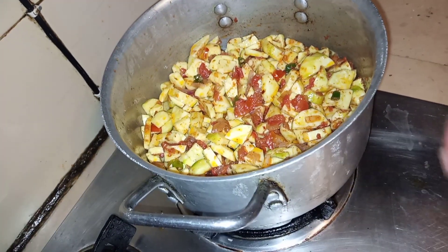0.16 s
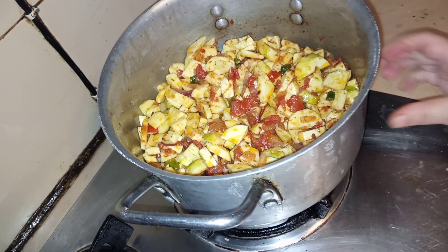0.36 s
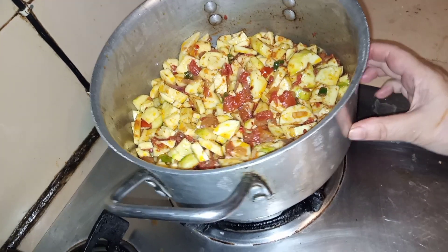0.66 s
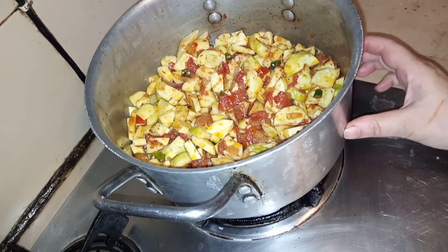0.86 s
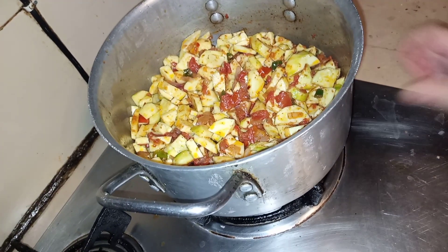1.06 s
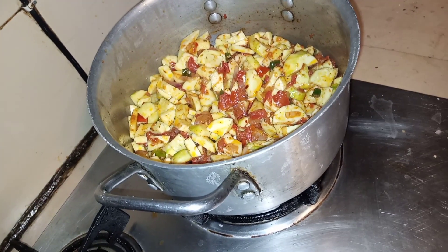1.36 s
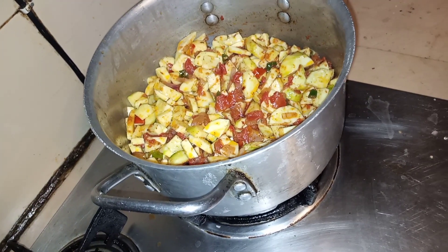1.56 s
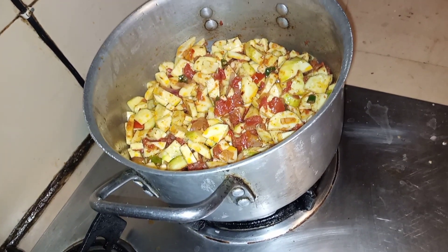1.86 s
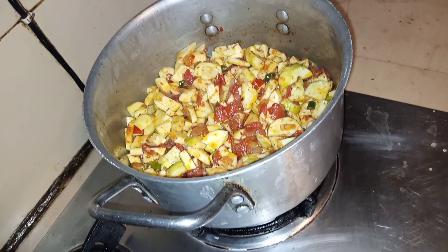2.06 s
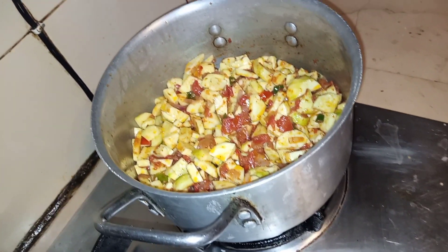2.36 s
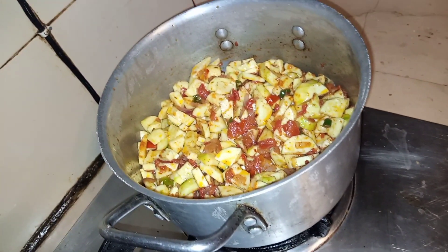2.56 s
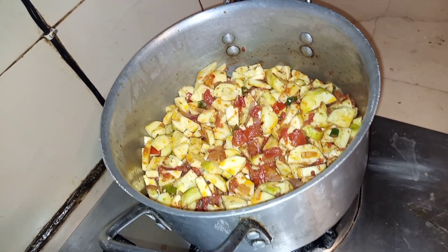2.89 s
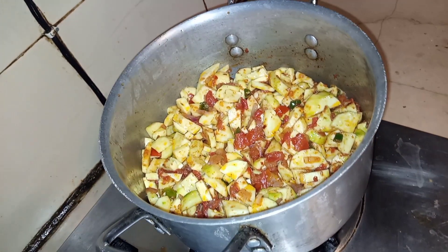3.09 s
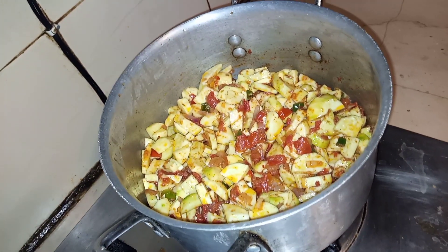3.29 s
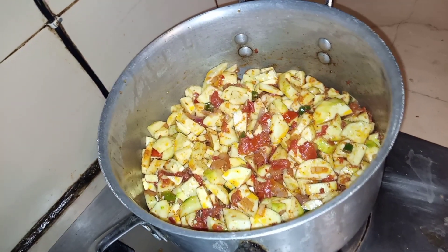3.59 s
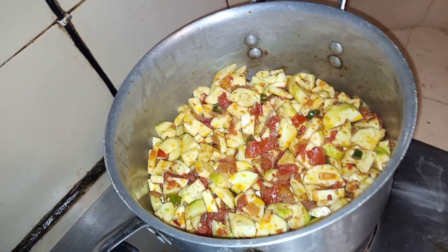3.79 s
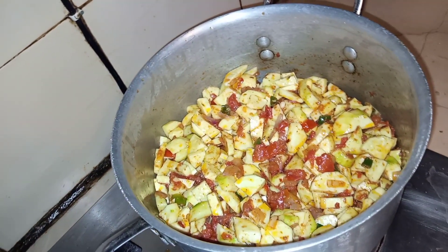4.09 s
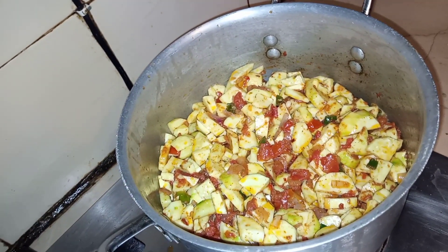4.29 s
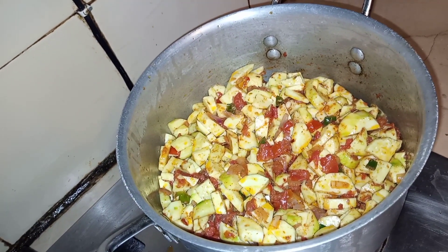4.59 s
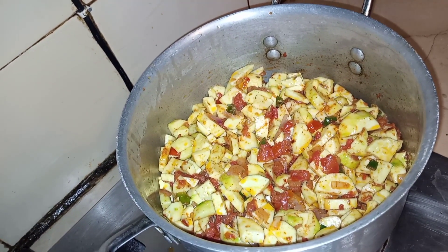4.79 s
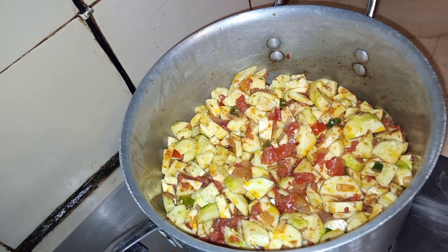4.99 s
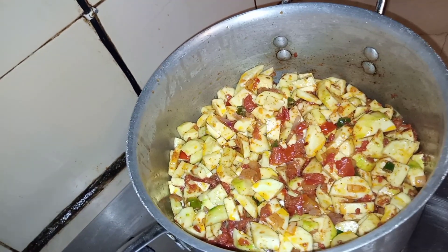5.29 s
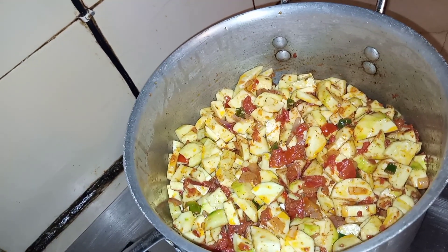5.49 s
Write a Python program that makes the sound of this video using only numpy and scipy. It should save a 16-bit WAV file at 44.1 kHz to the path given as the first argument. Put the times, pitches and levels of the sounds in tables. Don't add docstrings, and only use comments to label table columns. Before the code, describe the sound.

Quiet, steady fine sizzle of vegetables frying in a metal pot, with sparse snaps, faint distant thumps and a brief metallic scrape near the end.

```python
import sys
import numpy as np
from scipy import signal
from scipy.fft import rfft, irfft
from scipy.io import wavfile
from scipy.ndimage import uniform_filter1d

SR = 44100
rng = np.random.default_rng(int(sys.argv[2]) if len(sys.argv) > 2 else 0)


def log_audio(samples):
    frames = np.atleast_2d(samples).T
    limited = np.clip(frames, -1, 1)
    pcm = np.round(limited * 32767).astype(np.int16)
    wavfile.write(sys.argv[1], SR, pcm)


def gain_from_db(level_db):
    decades = np.asarray(level_db, float) / 20
    return 10 ** decades


N = 249144
CUTOFF_HZ = 15750


def rms_one(x):
    return x / np.sqrt(np.mean(x ** 2) + 1e-20)


def evened(x, window_s):
    return x / np.sqrt(uniform_filter1d(x ** 2, max(int(window_s * SR), 1)) + 1e-20)


def drift(rate):
    r = np.exp(-80 * np.pi * rate / SR)
    slow = signal.lfilter([1], [1, -2 * r, r * r], rng.standard_normal(N // 40 + 2002))
    slow = slow[2000:]
    return np.interp(np.arange(N) / 40, np.arange(len(slow)), rms_one(slow))


def ramp_db(s, hold, rise_db_s, fall_db_s):
    t = np.arange(N) / SR - s
    return np.minimum(rise_db_s * t, 0) - fall_db_s * np.maximum(t - hold, 0)


def resonate(x, hz, width_hz):
    r = np.exp(-np.pi * min(width_hz, SR / 3) / SR)
    return signal.lfilter([(1 - r * r) / 2, 0, (r * r - 1) / 2], [1, -2 * r * np.cos(2 * np.pi * hz / SR), r * r], x)


def body(x, modes):
    out = 0
    for k, (hz, width, db) in enumerate(modes):
        out = out + (-1) ** k * gain_from_db(db) / np.sqrt(width) * resonate(x, hz, width)
    return out


def bursts(per_s, spread_db):
    sizes = gain_from_db(spread_db * np.minimum(rng.exponential(1, N), 5)) * rng.choice([-1, 1], N)
    return rms_one(sizes * (rng.random(N) < per_s / SR) + 1e-18)


def tone_bursts(rows):
    out = np.zeros(N + SR)
    for s, db, hz, length in rows:
        t = np.arange(max(int(length * SR), 8)) / SR
        at = max(round((s - length / 2) * SR), 0)
        envelope = np.sin(np.pi * t / length) ** 2
        out[at:at + len(t)] += gain_from_db(db + 3) * envelope * np.sin(2 * np.pi * hz * t)
    return out[:N]


def spurt_db():
    # start_s, hold_s, lift_db (below 0: a dip)
    spurts = [(0.653, 0.0097, 0.5), (0.803, 0.0113, 1), (1.024, 0.035, -0.34), (1.518, 0.0304, 0.9),
              (2.042, 0.041, 0.5), (2.447, 0.033, 0.7), (2.855, 0.0125, 0.8), (3.142, 0.054, 1),
              (4.492, 0.0404, 1.5), (4.694, 0.055, 2), (5.379, .08, 1), (5.493, 0.075, 1.18)]
    rise_s, fall_s = 0.0117, 0.029
    return sum(db * gain_from_db(ramp_db(s, hold, 20 / rise_s, 20 / fall_s)) for s, hold, db in spurts)


def frying(per_s=14000, spread_db=3.0, blur=0.72, patchy_db=0.43, shared_db=.5):
    # frequency_hz, density_db (per Hz)
    oil_colour = [(500, -23), (850, -11.5), (1005, -9), (1035, -3.5), (1085, -2.5), (1160, -7), (1310, -11),
                  (1470, -8.5), (1740, -8.5), (2030, -4.5), (4470, -1.5), (5900, -3), (7980, -12),
                  (9600, -10), (13600, -17)]
    # frequency_hz, density_db (per Hz)
    port_colour = [(13870, -17), (14260, -15.5), (14620, -15), (15710, -10.5)]
    # frequency_hz, width_hz, boost_db
    pot_modes = [(1065, 70, 1), (1500, 38, 4), (2010, 78, 2.5), (2448, 110, 2), (2643, 279, 2.5),
                 (2884, 120, 2), (3169, 300, 2), (3330, 55, -2), (3615, 710, 3.5), (4177, 170, 2.03),
                 (5130, 110, -0.38), (5050, 71, -3), (5680, 620, 0.4), (6256, 110, 1.53), (6713, 74, 3),
                 (6800, 160, -0.5), (9100, 550, 1.66)]
    # start_s, sizzle_db
    vigour = [(0, -47), (.55, -48), (.87, -48), (1.13, -48.5), (1.4, -49.5), (1.8, -48.5), (2.1, -50.5),
              (2.5, -49.5), (2.9, -49.5), (3.6, -49.5), (4.4, -50), (4.64, -51), (4.85, -49.5), (5.05, -51),
              (5.35, -49), (5.5, -49), (5.65, -49)]
    # level_db (at usual vigour), vigour_share, spurt_share
    layers = [(-58.5, 0.39, 1.3), (-61, 0.47, 2.52), (-64.5, 0.49, 1.9)]

    start_s, vigour_db = np.transpose(vigour)
    sizzle_db = np.interp(np.arange(N) / SR, start_s, vigour_db)
    lift_db = spurt_db()
    usual_db = -50
    hum_db, fine_db, finest_db = (db + follows * (sizzle_db - usual_db) + lifted * lift_db
                                  for db, follows, lifted in layers)

    source = np.sqrt(1 - blur) * bursts(per_s, spread_db) + np.sqrt(blur) * rng.standard_normal(N)
    hz = np.maximum(np.fft.rfftfreq(N, 1 / SR), 1)
    points_hz, points_db = np.transpose(list(oil_colour) + list(port_colour))
    colour = gain_from_db(np.interp(np.log(hz), np.log(points_hz), points_db))
    for centre, width, db in pot_modes:
        colour = colour * gain_from_db(db / (1 + (2 * (hz - centre) / width) ** 2))
    top_db = np.interp(hz, CUTOFF_HZ + np.array([0, 20, 120, 140]), [0, -8, -8, -90])
    spectrum = rfft(source) * colour * gain_from_db(top_db)

    centres = np.array([850, 1050, 1300, 1600, 2000, 2500, 3100, 3900, 4900, 6000, 7200, 8500,
                        10000, 12000, 13500, 13900, 14300, 15600])
    groups, together = np.zeros((4, N)), drift(6.3)
    for k, centre in enumerate(centres):
        mask = np.interp(np.log(hz), np.log(centres), np.arange(len(centres)) == k)
        flicker = gain_from_db(patchy_db * drift(10) + shared_db * together)
        groups[np.searchsorted([1700, 7300, 14000], centre)] += flicker * irfft(spectrum * mask, N)
    hum, sizzle, fine, finest = (evened(g, 0.19) for g in groups)
    return gain_from_db(hum_db) * hum + gain_from_db(sizzle_db + lift_db) * sizzle + gain_from_db(fine_db) * fine + gain_from_db(finest_db) * finest


def house():
    # frequency_hz, width_hz, level_db
    floor_modes = [(54.7, 11, -9), (90.4, 32, 4)]
    wall_modes = [(138.8, 35.2, 0.15), (230, 144, -0.67)]
    cupboard_modes = [(285, 49, -10), (330, 35, 2.5), (388, 39.6, 1.5), (461.5, 58, -3)]
    worktop_modes = [(534, 49, -1.8), (643, 40, -0.45), (706, 63, -1.6), (867, 92, -0.81)]
    # start_s, hold_s, level_db
    on_floor = [(0.56, 0.22, -70.5), (0.765, 0.095, -64.5), (0.914, 0.073, -68), (1.116, 0.045, -68.5),
                (1.246, .14, -74.5), (1.467, 0.11, -71), (1.763, 0.11, -73), (2.004, .02, -71),
                (2.19, 0.048, -75), (2.556, .07, -71), (2.676, 0.116, -63.5), (2.973, 0.064, -66),
                (3.14, 0.069, -66), (3.233, 0.039, -64), (3.402, 0.031, -73), (3.56, 0.0204, -69.5),
                (3.79, 0.038, -69), (3.893, 0.1, -70.5), (4.06, 0.039, -73), (4.238, 0.034, -64),
                (4.377, .02, -71), (4.506, 0.038, -70), (4.671, .02, -69), (4.749, 0.0195, -64),
                (4.88, .02, -70), (5.205, 0.0214, -73), (5.327, 0.032, -72), (5.431, 0.083, -65),
                (5.595, .02, -75.5)]
    on_wall = [(0, 0.027, -71.5), (.33, .02, -69), (.75, 0.06, -61), (.82, 0.11, -66), (.94, 0.091, -64.5),
               (1.12, 0.033, -70), (1.47, 0.081, -70.5), (1.71, 0.018, -78.5), (2.19, .05, -75),
               (2.55, 0.137, -71.5), (2.75, 0.11, -64.5), (3.03, 0.013, -67), (3.15, 0.067, -66),
               (3.22, 0.037, -66), (3.85, 0.0185, -71), (4.22, 0.0325, -61), (4.36, 0.0186, -70),
               (4.51, 0.041, -74), (4.68, 0.15, -74), (5.4, 0.195, -63.5), (5.56, 0.052, -71.5)]
    on_cupboard = [(.2, 0.122, -72), (.44, 0.32, -71.5), (0.745, 0.14, -60), (.87, 0.14, -64),
                   (1.17, 0.16, -71.5), (1.96, 0.024, -66.5), (2.43, 0.039, -75.5), (2.735, 0.019, -62),
                   (2.77, 0.068, -67), (3.15, 0.114, -67), (3.41, 0.091, -68.5), (3.5, 0.177, -64),
                   (3.68, 0.12, -62.5), (3.88, 0.18, -64.5), (4.18, 0.16, -65.5), (4.5, 0.039, -65.5),
                   (4.7, 0.095, -71.5), (5.22, 0.028, -69), (5.33, 0.038, -61.5), (5.43, 0.088, -59),
                   (5.51, 0.1, -58.5)]
    on_worktop = [(0, 0.45, -66), (.4, 0.091, -64), (.75, 0.094, -62), (.99, 0.029, -63),
                  (1.11, 0.047, -65), (1.21, 0.3, -63.5), (1.7, 0.37, -68.5), (2.5, 0.071, -64.5),
                  (2.73, 0.053, -61), (2.88, 0.47, -66.5), (3.4, 0.092, -67.5), (3.52, 0.164, -60.5),
                  (3.68, 0.24, -61), (4, 0.166, -63), (4.18, 0.25, -64), (4.5, 0.06, -65),
                  (4.75, 0.125, -66.5), (5.32, 0.2, -63), (5.49, 0.14, -58.5)]
    stirrings = [-80, -77, -78.5, -72]

    rise_db_s, fall_db_s = 897.5, 260.5
    out = 0
    struck = zip((on_floor, on_wall, on_cupboard, on_worktop),
                 (floor_modes, wall_modes, cupboard_modes, worktop_modes), stirrings)
    for bumps, modes, stir_db in struck:
        wider = [(hz, 1.54 * width, 0) for hz, width, _ in modes]
        shaken = body(body(bursts(1800, 0.97), modes), wider)
        level_db = stir_db + 1.0 * drift(6)
        for s, hold, db in bumps:
            level_db = np.maximum(level_db, db + ramp_db(s, hold, rise_db_s, fall_db_s))
        out = out + gain_from_db(level_db - 2.5) * evened(shaken, 0.045)
    return out


def plops():
    # top_s, level_db (rms), pitch_hz, length_s
    plop_rows = [(.046, -63, 1113, 0.046), (.435, -59, 1055, 0.047), (.52, -62, 1141, .04),
                 (.733, -47, 5540, 0.0065), (.736, -37, 5940, .002), (.836, -58, 1067, .04),
                 (.856, -62, 1220, .04), (1.44, -59, 1070, 0.042), (1.556, -63, 2282, .04),
                 (1.617, -62, 2260, 0.044), (1.869, -64, 1614, .04), (1.965, -63, 1500, .04),
                 (2.0, -61, 2020, 0.027), (2.065, -55, 2105, .06), (2.19, -64, 1490, 0.026),
                 (2.29, -64, 2239, .03), (2.39, -62, 1500, .04), (2.441, -62, 1480, .04),
                 (2.586, -60, 1510, .05), (2.737, -59, 1540, 0.017), (2.887, -61, 1930, .02),
                 (2.984, -58, 1507, .045), (3.05, -59, 1070, .02), (3.129, -62, 1055, .05),
                 (3.16, -56, 1520, .035), (3.161, -60, 1910, .03), (3.492, -61, 2180, .04),
                 (3.585, -55, 1070, 0.051), (3.68, -64, 2002, 0.033), (3.78, -61, 1096, .03),
                 (3.927, -61, 2174, .04), (3.965, -57, 1060, 0.023), (4.0, -57, 1080, .02),
                 (4.008, -58, 2170, 0.044), (4.072, -60, 1930, 0.045), (4.14, -60, 1050, 0.037),
                 (5.57, -60, 1054, 0.059)]
    return tone_bursts(plop_rows)


def ticks():
    # top_s, level_db (rms), pitch_hz, length_s
    tick_rows = [(.1182, -47, 6000, .002), (.2463, -48, 6000, .002), (.4286, -48, 6000, .002),
                 (.6891, -47, 13500, .0004), (.6891, -52, 8500, .001), (.7354, -51, 9000, .001),
                 (.7995, -44, 14800, .0006), (.742, -46, 4500, .002), (.7445, -47, 6000, .003),
                 (.733, -54, 7600, .008), (1.0366, -45, 6000, .002), (1.2779, -47, 6000, .002),
                 (1.3454, -57, 9000, .0015), (1.6027, -60, 14600, .0015), (1.7469, -60, 14600, .0015),
                 (1.8828, -59, 14600, .0015), (2.0673, -50, 6000, .002), (2.0786, -54, 9000, .0015),
                 (2.3455, -59, 14600, .0015), (2.544, -59, 14600, .0015), (2.7449, -56, 14600, .0015),
                 (2.8219, -59, 14600, .0015), (2.9764, -55, 9000, .0015), (3.0929, -56, 9000, .0015),
                 (3.12, -58, 14600, .0015), (3.6764, -58, 14600, .0015), (3.7032, -52, 9000, .0015),
                 (3.706, -54, 14600, .0015), (3.7452, -56, 9000, .0015), (3.7925, -58, 14600, .0015),
                 (4.2261, -59, 14600, .0015), (4.3445, -57, 14600, .0015), (4.5018, -56, 14600, .0015),
                 (4.5158, -56, 14600, .0015), (4.6034, -58, 14600, .0015), (4.8693, -57, 14600, .0015),
                 (4.8843, -55, 9000, .0015), (4.8916, -55, 14600, .0015), (5.2059, -50, 6000, .002),
                 (5.2177, -58, 14600, .0015), (5.4224, -45, 5500, .0015), (5.4618, -51, 14600, .0015)]
    return tone_bursts(tick_rows)


def booms():
    # top_s, level_db (rms), pitch_hz, length_s
    boom_rows = [(.18, -68, 545, .09), (.27, -70, 535, .04), (.665, -69, 300, .04), (.66, -68, 720, .05),
                 (.99, -66, 625, .05), (2.19, -69, 750, .03), (2.49, -67, 670, .04), (2.86, -67, 780, .05),
                 (2.95, -69, 630, .1), (3.18, -67, 330, .06), (3.21, -68, 240, .04), (3.24, -64, 70, .05),
                 (.746, -60, 388, .03), (.748, -61, 648, .03), (.775, -56, 149, .06),
                 (.78, -53.5, 320, .03), (.78, -58, 395, 0.029), (.806, -50.5, 386, 0.062),
                 (.835, -56, 297, 0.06), (.88, -58, 370, 0.038), (1.025, -65, 528, .04),
                 (2.738, -56, 338, .03), (2.85, -66, 160, 0.031), (3.5, -66, 330, .06),
                 (3.646, -63, 450, 0.09), (3.71, -64, 326, .06), (3.753, -60, 417, .04),
                 (3.79, -64, 440, .05), (4.246, -62, 150, .05), (5.465, -61, 236, 0.0507),
                 (5.505, -55, 344, .06), (5.509, -60, 727, 0.041), (5.515, -60, 582, 0.055),
                 (5.54, -54, 322, 0.0347), (5.555, -58, 482, 0.04), (5.587, -58, 595, 0.039),
                 (5.58, -58, 325, 0.049), (5.631, -57, 335, 0.055)]
    return tone_bursts(boom_rows)


def spits():
    # start_s, peak_db, centre_hz, width_hz, t60_s
    spit_rows = [(.689, -41, 15000, 9900, 0.0049), (.737, -40, 5440, 2700, .04),
                 (.764, -50, 12000, 5000, .005), (1.2, -44, 2850, 560, 0.03),
                 (3.148, -46, 6500, 1400, 0.044), (.7985, -43, 15300, 2500, .006),
                 (2.085, -54, 2100, 70, 0.2), (3.146, -50, 1600, 300, 0.1), (3.118, -51, 11800, 4500, .015),
                 (3.129, -52, 11500, 1200, .02), (3.146, -55, 11500, 2500, .015),
                 (3.153, -51, 12000, 1500, .02), (2.4, -42, 3120, 370, 0.077), (2.732, -52, 500, 500, 0.06),
                 (1.035, -47, 5200, 2500, .15), (4.86, -59, 10700, 1200, .9), (4.93, -61, 10800, 1000, .9),
                 (5.0, -60, 10900, 1000, .8)]
    out, span = np.zeros(N), SR // 5
    t = np.arange(span) / SR
    for s, db, hz, width, t60 in spit_rows:
        puff = rng.standard_normal(span) * gain_from_db(-60 * t / t60)
        ping = resonate(resonate(puff, hz, width), hz, width)
        at = round(s * SR)
        out[at:at + span] += gain_from_db(db) * ping / np.abs(ping).max()
    return out


def utensil():
    # frequency_hz, width_hz, level_db
    metal_modes = [(1677, 27, -14), (2407, 23, -11), (2682, 25, -11), (2990, 25.3, -1), (3900, 13.7, 0.5),
                   (3940, 53, -4), (4760, 22, -8), (5280, 36, -13), (5700, 40, -6), (6800, 36, -15),
                   (6930, 93, -10), (7900, 50, -25.5), (9020, 40, -28), (9540, 50, -30), (10940, 62, -17),
                   (14600, 50, -16), (15600, 60, -17)]
    # start_s, hold_s, level_db, brightness_db (modes above 4.3 kHz), depth_db (below 3.5 kHz)
    stroke_rows = [
        (4.503, 0.032, -64.5, 9.5, -11),
        (4.713, .035, -65, 16, -5.5),
        (5.396, .014, -58.5, 0, -0.5),
        (5.413, 0.012, -58, 9, 4),
        (5.431, 0.026, -55, 9, 4),
        (5.455, .012, -61, 16, 9),
        (5.48, .016, -61, 12, 3),
    ]
    strokes = np.array([db + ramp_db(s, hold, 1500, 1200) for s, hold, db, _, _ in stroke_rows])
    brightness_db, depth_db = np.array(stroke_rows)[:, 3:].T
    high, middle, low = (gain_from_db(np.max(strokes + np.reshape(tilt_db, (-1, 1)), axis=0))
                         for tilt_db in (brightness_db, 0, depth_db))
    slips, out = bursts(3000, 1.7), 0
    for hz, width, db in metal_modes:
        level = high if hz > 4300 else low if hz < 3500 else middle
        ringing = resonate(resonate(slips, hz, width), hz, 6.9 * width)
        out = out + gain_from_db(db - 2.0) * level * evened(ringing, 0.012)
    return out


def squeaks():
    # top_s, level_db (rms), pitch_hz, length_s
    squeak_rows = [(4.505, -62, 14700, .02), (4.508, -57, 3940, .015), (4.508, -58, 5290, .02),
                   (4.512, -61, 6860, .02), (4.515, -59, 5740, .025), (4.53, -63, 14700, .02),
                   (4.726, -65, 9060, 0.056), (4.725, -62, 4750, .03), (4.736, -61, 3980, .03),
                   (4.732, -60, 6890, .03), (5.395, -58, 5720, .02), (5.41, -56, 4720, .02),
                   (5.416, -45, 3900, .011), (5.4235, -43.5, 3900, .011), (5.423, -51, 4720, .009),
                   (5.416, -53, 3010, .018), (5.428, -49, 3015, .018), (5.436, -43, 3880, .018),
                   (5.4445, -43, 3880, .011), (5.452, -45, 3880, .012), (5.446, -45, 3020, .022),
                   (5.46, -45, 3900, .01), (5.434, -52, 5710, .026), (5.45, -53, 5710, .016),
                   (5.464, -56, 5710, .008), (5.44, -62, 14650, .05), (5.44, -64, 10940, .04),
                   (5.455, -53, 4720, .014), (5.466, -54, 4720, .012), (5.463, -54, 2400, .015),
                   (5.465, -58, 1695, .05), (5.484, -48, 3000, .026), (5.486, -56, 3900, .026),
                   (5.479, -52, 4740, .009), (5.491, -53, 4740, .012)]
    return tone_bursts(squeak_rows)


def scene():
    mono = frying() + house() + plops() + ticks() + booms() + spits() + utensil() + squeaks()
    return np.array([mono, mono])


def reflections(shape, ripple_db):
    field = uniform_filter1d(rng.standard_normal(shape), size=60, axis=1)
    field = uniform_filter1d(uniform_filter1d(field, size=40, axis=1), size=2, axis=0)
    return gain_from_db(ripple_db * field / field.std())


def denoise(x, subtract=0.1265, bass_subtract=0.25, floor_db=-9):
    hz, _, cells = signal.stft(x, SR, nperseg=1024, noverlap=768)
    ripple_db = 1.4 * np.clip(hz[:, None] / 2500, 0, 1)
    cells = cells * reflections(cells.shape, ripple_db)
    power = uniform_filter1d(np.abs(cells) ** 2, size=3, axis=1) + 1e-20
    usual = np.median(power, axis=1, keepdims=True)
    share = subtract + bass_subtract / (1 + (hz[:, None] / 800) ** 4)
    gain = np.sqrt(np.maximum(1 - share * usual / power, gain_from_db(2 * floor_db)))
    top_db = np.interp(hz, CUTOFF_HZ + np.array([0, 20, 100, 130]), [0, -8, -8, -90])
    gain = gain * gain_from_db(top_db)[:, None]
    return signal.istft(cells * gain, SR, nperseg=1024, noverlap=768)[1][:N]


def side_noise():
    # centre_s, low_hz, high_hz, level_db
    side_rows = [(.092, 5650, 7530, -57), (.161, 4170, 5450, -56.5), (.161, 6350, 7730, -62),
                 (1.624, 5147, 6440, -61.5), (1.624, 13200, 14700, -71.5), (2.181, 5170, 6300, -60),
                 (3.272, 13200, 14700, -72), (3.992, 4200, 5730, -59), (3.992, 7700, 9050, -70),
                 (4.155, 6980, 8500, -69), (4.155, 10500, 12000, -73), (4.549, 4204, 5240, -58),
                 (4.805, 5200, 6320, -62.5), (4.805, 13950, 15700, -67.5)]
    side, hz = np.zeros(N), np.fft.rfftfreq(2048, 1 / SR)
    fade = signal.windows.kaiser_bessel_derived(2048, 4 * np.pi) ** 2
    for s, low_hz, high_hz, db in side_rows:
        noise = rng.standard_normal(2048)
        band = rms_one(irfft(rfft(noise) * (hz > low_hz) * (hz < high_hz)))
        at = round(s * SR) - 1024
        side[at:at + 2048] += gain_from_db(db) * band * fade
    return side * [[1], [-1]]


def top_cut(x):
    return signal.sosfilt(signal.butter(12, 16360, fs=SR, output="sos"), x)


def record(dry):
    bass_cut = signal.butter(2, 46, "high", fs=SR, output="sos")
    mono = signal.sosfilt(bass_cut, denoise(dry[0]))
    mix = gain_from_db(-0.19) * mono + side_noise()
    return top_cut(mix)


dry = scene()
out = record(dry)
log_audio(out)
```